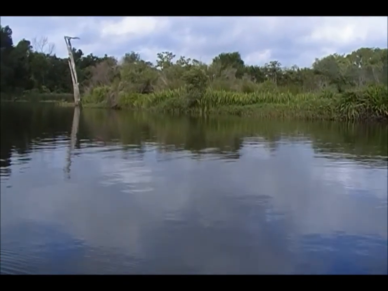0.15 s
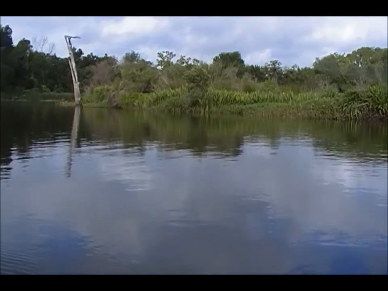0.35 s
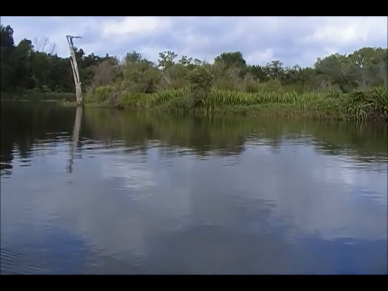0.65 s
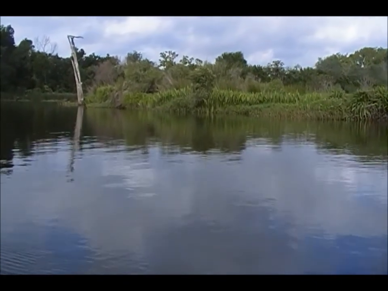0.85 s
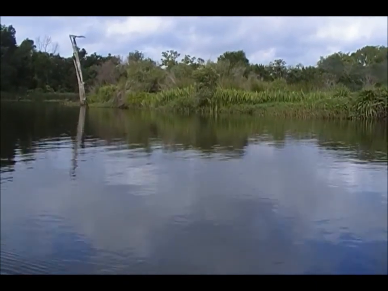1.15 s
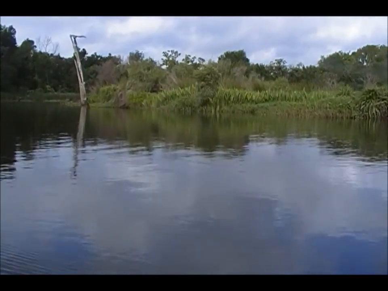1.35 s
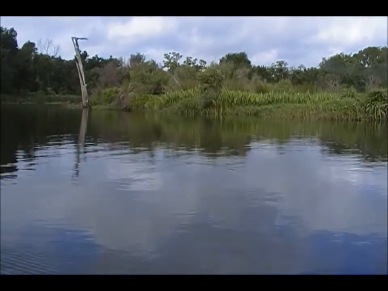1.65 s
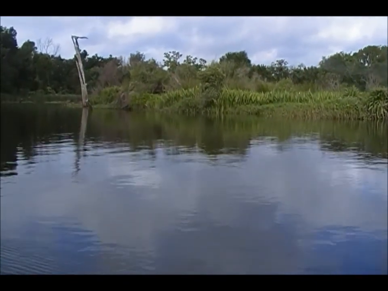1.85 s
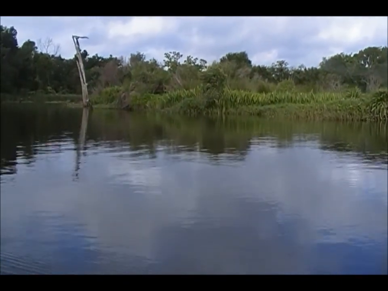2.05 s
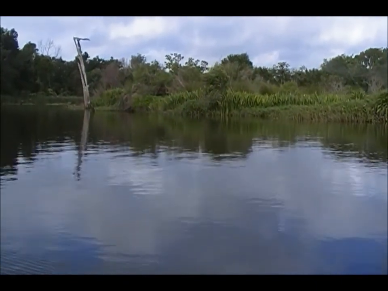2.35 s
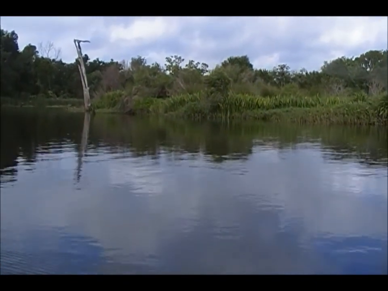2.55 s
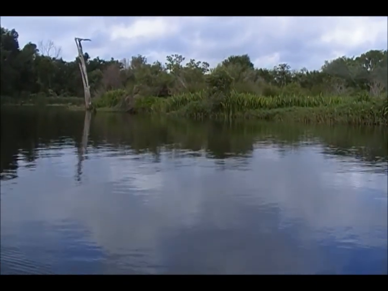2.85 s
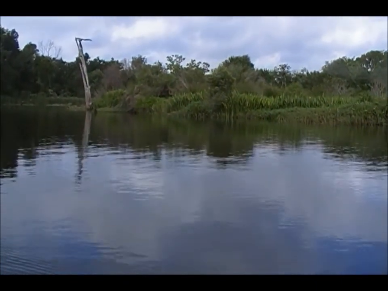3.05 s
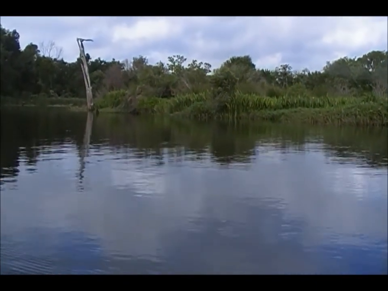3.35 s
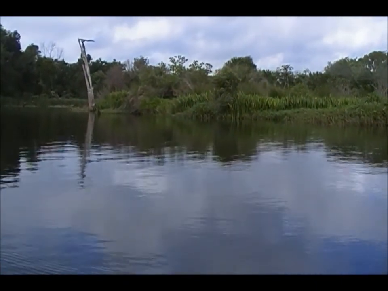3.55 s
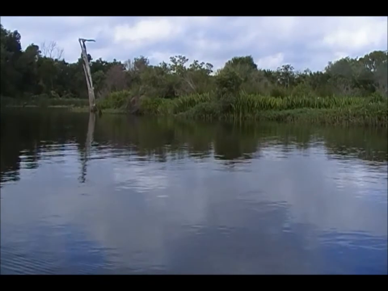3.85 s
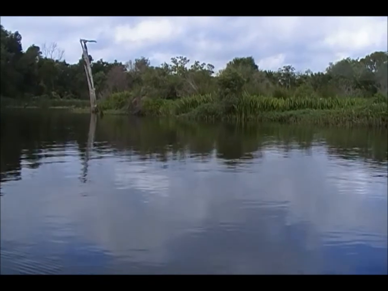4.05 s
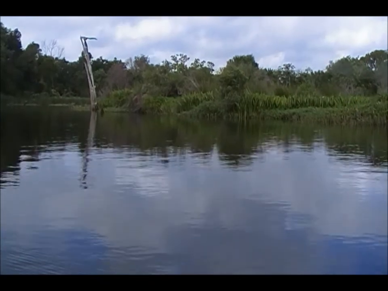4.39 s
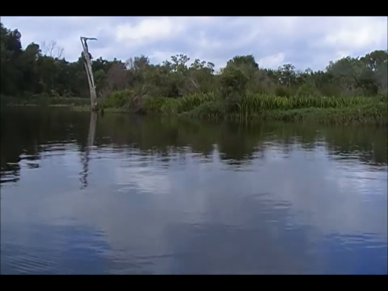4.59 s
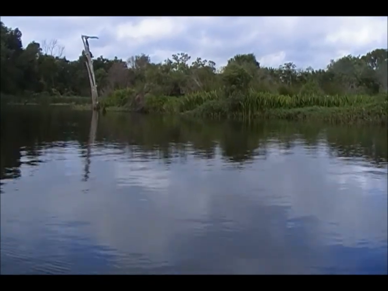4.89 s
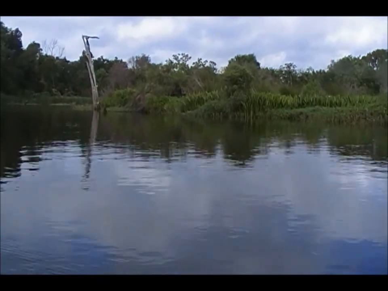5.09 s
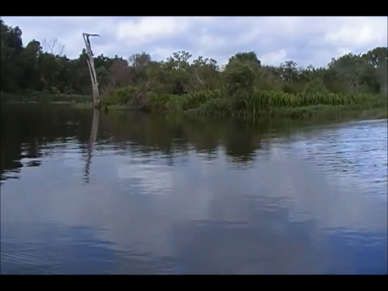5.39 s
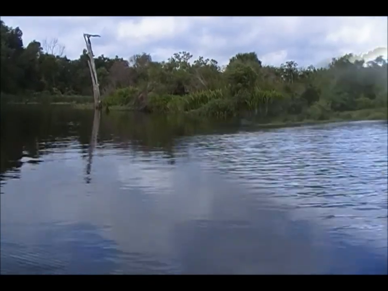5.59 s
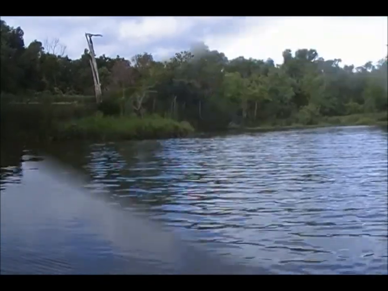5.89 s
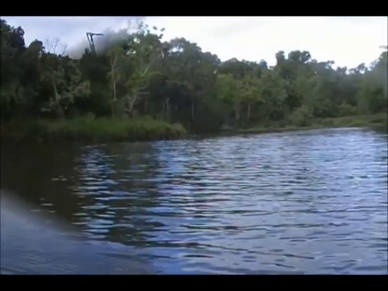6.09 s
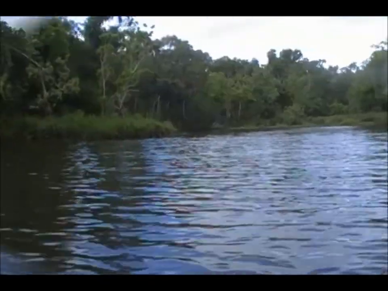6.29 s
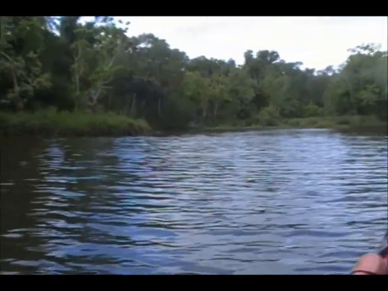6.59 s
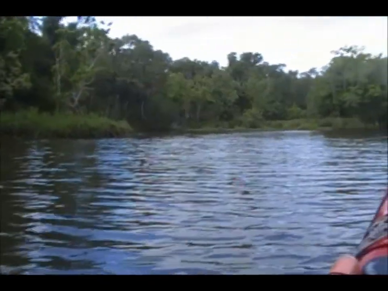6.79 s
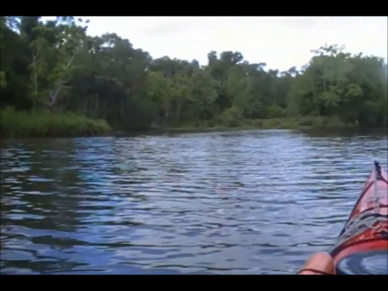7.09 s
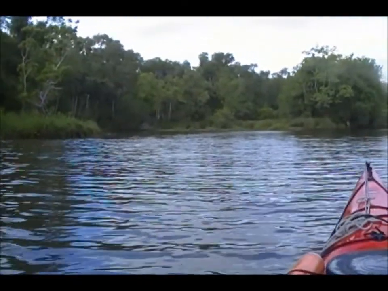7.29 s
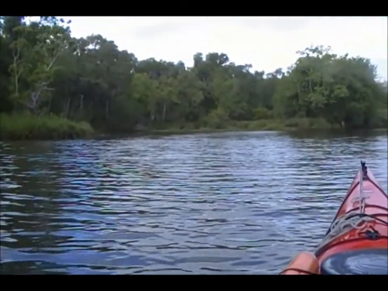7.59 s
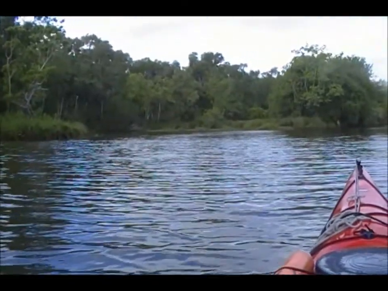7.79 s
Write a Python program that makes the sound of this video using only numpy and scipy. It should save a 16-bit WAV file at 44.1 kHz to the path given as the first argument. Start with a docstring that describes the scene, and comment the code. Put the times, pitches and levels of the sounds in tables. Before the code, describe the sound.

On open lake water, cicadas whine high and steady toward the left, with one fast insect trill and a soft hiss of air. Wind rumbles and thumps on the microphone, strongest in the first two seconds and again around 3.2 to 3.8. A water bird hoots twice in the first half second. Thin, high chips come now and then from the left. A drooping whistle at 1.5 seconds leads into nine rising whistles from 1.9 to 4.1, growing more echoing. At 5.2 the sound cuts to a nearer wooded bank: gusts and trill stop, the cicadas are louder, and leaves hiss lightly until about 6.7. A short whistled phrase, quick ticks and three high, buzzy falling notes follow before 6 seconds. From 6.4 to the end at 8, a distant bird repeats a falling two-note figure. A very faint electronic whine persists throughout.

```python
"""A wooded lake from a kayak: open water, then a hard cut to a view of the nearer bank.
Cicadas whine in the trees, their timbal clicks ringing their bodies, over a soft hiss of air and leaves.
On open water one insect trills and gusts buffet the microphone ports. Songbirds whistle and chip
from the bank and echo in the wood; a water bird hoots twice. Camera electronics sing faintly throughout."""
import sys
import numpy as np
from scipy import signal
from scipy.fft import rfft, irfft, next_fast_len
from scipy.io import wavfile

SR = 44100
rng = np.random.default_rng(int(sys.argv[2]) if len(sys.argv) > 2 else 0)


def dump_mix(stems):
    """Bounce the given channels to the path in sys.argv[1] as a 16-bit WAV at rate SR."""
    frames = np.atleast_2d(stems).T  # one column per channel
    limited = np.clip(frames, -1, 1)  # hard clip at full scale
    pcm = np.round(limited * 32767).astype(np.int16)
    wavfile.write(sys.argv[1], SR, pcm)


N = 350154
N_FFT = next_fast_len(N)
TIME_S, BIN_HZ = np.arange(N) / SR, np.fft.rfftfreq(N_FFT, 1 / SR)


def from_db(db):
    """Decibels to gain."""
    return 10 ** (np.asarray(db) / 20)


def unit_rms(x):
    """Scale to unit rms."""
    return x / np.sqrt(np.mean(x ** 2) + 1e-20)


def per_bin(rows):
    """Columns of a spectrum table at every bin, interpolated in log frequency."""
    hz, *columns = np.transpose(rows)
    return [np.interp(np.log(BIN_HZ + 1), np.log(hz), column) for column in columns]


def white():
    """Spectra of two independent noises at 0 dB per Hz."""
    return rfft(rng.standard_normal((2, N_FFT))) * np.sqrt(SR / 2)


def to_sound(spectrum):
    """Bins to samples."""
    return irfft(spectrum, N_FFT)[..., :N]


def shaped_noise(spectrum):
    """Two independent noises of one spectral shape, unit rms."""
    return unit_rms(to_sound(white() * from_db(per_bin(spectrum)[0])))


def pan(left_db):
    """Constant-power stereo gains; left_db is left minus right."""
    gains = from_db(np.array([[1], [-1]]) * left_db / 2)
    return gains / np.sqrt(np.mean(gains ** 2, axis=0))


def blend(pair, coherence):
    """Mix two independent signals into partly coherent left and right."""
    mid, side = np.sqrt(1 + coherence) * pair[0], np.sqrt(1 - coherence) * pair[1]
    return (mid + side * [[1], [-1]]) / np.sqrt(2)


def lagged(spectra, lead_ms):
    """Sound from the left reaches the right port later."""
    return spectra * np.exp(-2j * np.pi * BIN_HZ * lead_ms / 1000 * np.array([[0], [1]]))


def drift(rate_hz, samples=N):
    """Random wander, spread near 1."""
    knots = rng.standard_normal(6000)
    return np.interp(TIME_S[:samples] * rate_hz, np.arange(len(knots)), knots)


def gust_envelope(start_s, hold_s, release_s, attack_s=.054):
    """Rises to 1 at start_s, holds, decays."""
    early, late = (start_s - TIME_S) / attack_s, (TIME_S - start_s - hold_s) / release_s
    return np.exp(-np.clip(np.maximum(early, late), 0, 20))


# Air and leaf spectrum per view: freq_hz, density_db
OPEN_AIR = [(30, -59.5), (80, -61), (220, -65), (400, -76), (700, -77.5), (1200, -85), (1550, -82),
            (2100, -87.5), (3200, -86.5), (4500, -90), (6900, -91.5), (7600, -91.5), (9000, -92.5),
            (11400, -97.5)]
BANK_AIR = [(30, -71.5), (90, -61), (190, -60.5), (290, -65), (400, -73), (650, -74.5), (1200, -82),
            (2200, -83.5), (3700, -85.5), (5000, -85.5), (6800, -88), (8300, -81), (8900, -89),
            (11400, -92)]
# Its stereo image: freq_hz, coherence, left_db
OPEN_IMAGE = [(60, 0.86, 1.5), (220, 1, 1), (700, 0.9, 0), (1180, 0.78, 1), (1540, 0.53, -3.5),
              (2200, 0.59, 0), (3980, 0.17, 0.5), (7500, 0.13, 5), (10000, 0.4, 0)]
BANK_IMAGE = [(60, 0.97, 1.1), (200, 1, .7), (700, 0.92, 1), (1500, 0.66, 0.82), (2600, 0.62, 1.1),
              (3900, .35, 1), (5200, 0.65, 2.3), (8200, .3, 3.8), (10000, 0.27, .8)]


def air(spectrum, image, lead_ms):
    """Distant air, leaves and hiss: coherent in the bass, diffuse in the treble."""
    coherence, left_db = per_bin(image)
    noise = lagged(blend(white(), coherence), lead_ms)
    return to_sound(noise * pan(left_db) * from_db(per_bin(spectrum)[0]))


def electronics_whine(level_db, left_db, pitch_hz=7867.1, frames_per_s=29.97):
    """Thin tone from the camera's electronics; its sign flips every frame."""
    flips = np.tanh(10 * np.sin(np.pi * frames_per_s * TIME_S))
    return from_db(level_db) * pan(left_db) * unit_rms(flips * np.sin(2 * np.pi * pitch_hz * TIME_S))


def wood(call, wet_db, t60_s, left_db, lead_ms, scatter=.35, reed_decay_s=.008):
    """Reeds blur a call by a few ms; trunks and leaves return fading echoes."""
    t = TIME_S[:SR]
    reeds = rng.standard_normal(SR) * np.exp(-t / reed_decay_s)
    reeds *= np.sqrt(scatter / np.sum(reeds ** 2))
    blurred = np.sqrt(1 - scatter) * call + signal.fftconvolve(call, reeds)[:N]
    direct = np.array([blurred, np.interp(TIME_S - lead_ms / 1000, TIME_S, blurred)])
    tail = blend(rng.standard_normal((2, SR)), coherence=.6)
    tail *= from_db(-60 * t / t60_s) * (1 - np.exp(-t / .011))
    tail /= np.sqrt(np.sum(tail ** 2) / 2)
    echoes = signal.fftconvolve(call[None], tail, axes=1)[:, :N]
    return pan(left_db) * (direct + from_db(wet_db) * echoes)


# Cicada body resonance per view: freq_hz, density_db
OPEN_CICADA_BODY = [(5200, -88.5), (5400, -84), (5550, -74), (5750, -71), (5950, -67.5), (6100, -69.5),
                    (6280, -77.5), (6400, -81.5), (6520, -97)]
BANK_CICADA_BODY = [(5150, -77.5), (5350, -74), (5550, -62.5), (5720, -60), (5850, -56), (6030, -63),
                    (6200, -66.5), (6400, -77.5), (6520, -87)]


def cicadas(body, gain_db, scatter, coherence, left_db, lead_ms, clicks_per_s=260, count=10):
    """Timbals buckle in fast uneven click trains that ring the body; foliage smears a share."""
    clicks = np.zeros((2, N))
    for k in range(count):
        rate_hz = clicks_per_s * rng.uniform(.6, 1.4) * (1 + .05 * drift(20))
        cycles = np.cumsum(rate_hz) / SR + rng.random()
        at = np.flatnonzero(np.diff(np.floor(cycles)))
        clicks[k % 2, at] += rng.choice([-1, 1], len(at)) * (1 + 2 * rng.random(len(at)))
    direct = rfft(unit_rms(clicks), N_FFT) * np.sqrt(SR / 2)
    chorus = blend(np.sqrt(1 - scatter) * direct + np.sqrt(scatter) * white(), coherence)
    outside_hz = np.abs(BIN_HZ - np.clip(BIN_HZ, body[0][0], body[-1][0]))
    chorus *= from_db(gain_db + per_bin(body)[0] - .066 * outside_hz)
    return to_sound(lagged(chorus, lead_ms)) * pan(left_db)


def insect_trill(gain_db=-52, strokes_per_s=45.3, top_hz=6434, bottom_hz=5550, duty=.8):
    """One insect above the chorus: each wing stroke scrapes a fresh falling note."""
    stroke, within = np.divmod(np.cumsum(strokes_per_s * (1 + .006 * drift(3))) / SR, 1)
    progress = np.minimum(within / duty, 1)
    hz = (top_hz + (bottom_hz - top_hz) * progress ** 2) * (1 + .00883 * drift(400))
    cycles = np.cumsum(hz) / SR + rng.random(N)[stroke.astype(int)]
    swell = np.sqrt(np.abs(np.sin(np.pi * progress)))
    trill = from_db(gain_db) * unit_rms(swell * np.sin(2 * np.pi * cycles))
    return wood(trill, wet_db=-7, t60_s=.35, left_db=9, lead_ms=.014)


# Gusts at the ports: start_s, hold_s, release_s, relative_db
GUSTS = [(0.014, .45, 0.027, -30), (0.578, .17, 0.11, -32), (0.915, 0.53, 0.31, -28),
         (1.743, 0.17, 0.21, -31), (3.15, 0.43, 0.26, -31.5), (4.147, 0.11, .2, -44)]
# Turbulence spectra: freq_hz, relative_db
LARGE_EDDIES = [(20, 3.5), (45, 3.5), (90, 3), (150, -1.5), (230, -13), (330, -28), (480, -35), (900, -52),
                (2000, -70)]
SMALL_EDDIES = [(20, -4), (60, 7.5), (160, 4.5), (300, -6.5), (450, -15.5), (800, -36.5), (2000, -60)]


def wind(gain_db, lump_db, lumps_per_s, brighten, lull_db=-52.5, windward_db=6.5):
    """Separate turbulence at each port, left windward; small eddies grow faster with speed."""
    gusts = [from_db(db) * gust_envelope(*timing) for *timing, db in GUSTS]
    gust_db = np.maximum(20 * np.log10(np.max(gusts, axis=0)), lull_db)
    small_db = brighten * (gust_db + 15.5) - 6.5
    flow = shaped_noise(LARGE_EDDIES) + shaped_noise(SMALL_EDDIES) * from_db(small_db)
    lumps = unit_rms(from_db(lump_db * np.array([drift(lumps_per_s), drift(lumps_per_s)])))
    return flow * lumps * pan(windward_db) * from_db(gust_db + gain_db)


# Strongest single eddies: peak_s, relative_db, left_db
EDDY_HITS = [(0.085, -10, -8), (0.234, -13.5, 6.5), (0.458, -10.5, 11), (0.476, -4.5, 13),
             (0.939, -7.5, 14), (1.08, -8.5, 11), (1.229, -15, 6), (1.29, -13.5, 11), (1.418, -12, 14.0),
             (3.41, -15, 17), (3.456, -14, 4), (4.759, -21, 8), (6.659, -31, 0.5)]


def buffets(gain_db, rise_s, fall_s):
    """Fast eddies hit the ports: short thumps, brighter than the steady flow."""
    push = sum(from_db(db) * pan(left_db) * gust_envelope(peak_s, 0, fall_s, rise_s)
               for peak_s, db, left_db in EDDY_HITS)
    return from_db(gain_db) * push * shaped_noise(SMALL_EDDIES)


def add_whistle(track, start_s, hz, gain, octave_db):
    """Add a sine with a weak octave to the track."""
    phase = 2 * np.pi * np.cumsum(hz) / SR
    tone = np.sqrt(2) * gain * (np.sin(phase) + from_db(octave_db) * np.sin(2 * phase))
    start = int(np.clip(start_s * SR, 0, N))
    track[start:start + len(tone)] += tone[:N - start]


def glided(notes, ratios):
    """Expand each note's pitch to start, middle and end pitches."""
    return [(start_s, length_s, *(hz * np.array(ratios)), db) for start_s, length_s, hz, db in notes]


def arcs(notes, waver, octave_db=-40):
    """Whistles that glide through three pitches, swelling and fading."""
    track = np.zeros(N)
    for start_s, length_s, *pitches_hz, level_db in notes:
        n = int(length_s * SR)
        parabola = np.polyfit([0, .5, 1], pitches_hz, 2)
        hz = np.polyval(parabola, np.linspace(0, 1, n)) * (1 + waver * drift(293, n))
        add_whistle(track, start_s, hz, from_db(level_db) * signal.windows.tukey(n, .6), octave_db)
    return track


# Far bird's two-note figure: offset_s, length_s, pitch_hz, level_db
FAR_FIGURE = [(0, .115, 2865, -49.5), (.16, .07, 2770, -54.5)]


def far_bird(start_s=6.385, period_s=.255, count=6, loudest_s=7.15, fade_db_per_s=4):
    """A long falling note and a short soft one, repeated steadily, loudest in mid-song."""
    notes = [(at_s + offset_s, length_s, hz, db - fade_db_per_s * abs(at_s - loudest_s))
             for at_s in start_s + period_s * np.arange(count)
             for offset_s, length_s, hz, db in FAR_FIGURE]
    call = arcs(glided(notes, ratios=(1.13, 1, .945)), waver=.014)
    return wood(call, wet_db=0, t60_s=.75, left_db=.5, lead_ms=-.015)


def drooping_bird(start_s=1.48, length_s=.315, pitch_hz=2920, sag_hz_per_s=520, bend_hz=220):
    """One thin whistle that sags, swells and bends down at its end."""
    call, t = np.zeros(N), np.arange(0, length_s, 1 / SR)
    hz = pitch_hz - sag_hz_per_s * t - bend_hz * np.exp((t - length_s) / .018)
    hz *= 1 + .003 * drift(290, len(t))
    level_db = -55 + 3 * (t / length_s) ** 2
    add_whistle(call, start_s, hz, from_db(level_db) * signal.windows.tukey(len(t), .1), octave_db=-36)
    return wood(call, wet_db=-10, t60_s=.4, left_db=1, lead_ms=0)


# Small bird's chips: start_s, length_s, pitch_hz, level_db
CHIPS = [(.4, .03, 7400, -50), (.45, .04, 7400, -56), (2.255, .014, 7400, -51), (2.332, .014, 7400, -49),
         (2.696, 0.012, 7930, -46), (4.042, .014, 7400, -48), (4.066, .032, 7700, -51),
         (4.756, .012, 7500, -44)]


def chipping_bird():
    """Thin rising chips on the left."""
    call = arcs(glided(CHIPS, ratios=(.89, 1, 1.01)), waver=.037)
    return wood(call, wet_db=-5, t60_s=.3, left_db=15, lead_ms=.04)


# High lisps: start_s, length_s, pitch_hz, level_db
LISPS = [(5.25, 0.16, 6940, -50), (5.45, .17, 7100, -47.5), (5.67, .15, 7020, -48.5)]


def lisping_bird():
    """Three buzzy falling notes, mostly echo."""
    call = arcs(glided(LISPS, ratios=(1.015, .96, .82)), waver=.029)
    return wood(call, wet_db=4, t60_s=.64, left_db=2, lead_ms=-.009)


# Water bird's hoots: start_s, length_s, pitch_hz, level_db
HOOTS = [(.106, .1, 676, -33.5), (.362, .056, 663, -37)]


def water_bird():
    """Two rising hoots, low enough that the reeds barely blur them."""
    call = arcs(glided(HOOTS, ratios=(.8, 1, 1.03)), waver=.02, octave_db=-20)
    return wood(call, wet_db=-12, t60_s=.31, left_db=.5, lead_ms=.045, scatter=.034)


# Song phrase: start_s, length_s, start_hz, middle_hz, end_hz, level_db
PHRASE = [(5.252, .034, 4030, 4320, 3950, -41), (5.305, 0.054, 2420, 2750, 2900, -48),
          (5.344, .024, 3210, 3223, 3150, -36.5), (5.425, 0.045, 2780, 2560, 2100, -46)]
# Bird ticks: start_s, length_s, pitch_hz, level_db
TICKS = [(5.274, 0.011, 3700, -42), (5.612, 0.016, 5700, -36), (5.862, 0.023, 4800, -47),
         (6.905, 0.01, 1750, -44.5)]


def bank_birds():
    """One short whistled phrase from the near bank, and quick falling ticks."""
    call = arcs(PHRASE + glided(TICKS, ratios=(1.19, .97, .86)), waver=.012, octave_db=-36)
    return wood(call, wet_db=-2, t60_s=.55, left_db=1, lead_ms=-.008)


# Rising whistles: flick_s, level_db
UPSLURS = [(1.944, -44.5), (2.264, -42), (2.539, -40), (2.803, -37), (3.056, -38.5), (3.312, -40.5),
           (3.569, -42), (3.838, -42.5), (4.12, -46.5)]
# Their shared gesture: from_flick_s, pitch_hz, relative_db
UPSLUR_GESTURE = [(-.17, 1800, -19), (-.09, 2480, -18), (-.05, 2950, -7.5), (-.02, 3200, -3.5),
                  (-.006, 3310, .5), (0, 3650, -5), (.005, 4150, -11.5), (.01, 5100, -19)]


def upslurs(waver=.013, flutter_db=2.5, attack_s=.018, sag_per_note=.0033):
    """Rising whistles, each with a longer run-up; the closing flick weakens as the bird tires."""
    track = np.zeros(N)
    from_flick_s, pitch_hz, shape_db = np.transpose(UPSLUR_GESTURE)
    for k, (flick_s, level_db) in enumerate(UPSLURS):
        run_up_s, flick_db = .058 + .015 * k, 15.75 - 1.8 * k
        t = np.arange(-run_up_s, from_flick_s[-1], 1 / SR)
        hz = (1 - k * sag_per_note) * np.interp(t, from_flick_s, pitch_hz)
        hz *= 1 + waver * drift(250.5, len(t))
        effort_db = np.interp(t, from_flick_s, shape_db) + np.interp(t, [-.004, .008], [0, flick_db])
        effort_db += flutter_db * drift(134, len(t))
        edges = np.minimum((t + run_up_s) / attack_s, 1) * signal.windows.tukey(len(t), .08)
        add_whistle(track, flick_s - run_up_s, hz, from_db(level_db + effort_db) * edges, octave_db=-27)
    return track


def lead_songbird(turn_span_s=(2.6, 3.4)):
    """Sings the upslurs and turns away midway: less direct sound, more echo."""
    call, turned = upslurs(), np.interp(TIME_S, turn_span_s, [0, 1])
    facing = wood(call * np.sqrt(1 - turned), wet_db=-3, t60_s=.45, left_db=1, lead_ms=.05)
    away = wood(call * turned * from_db(-3.5), wet_db=3, t60_s=.5, left_db=1, lead_ms=.05)
    return facing + away


def scene(cut_s=5.213, calm_db=-1.8, breeze_db=1.14):
    """Open water, then the bank, where a breeze stirs the trees; birds and whine span the cut."""
    far_chorus = cicadas(OPEN_CICADA_BODY, gain_db=.64, scatter=.49, coherence=.62,
                         left_db=11, lead_ms=.037)
    near_chorus = cicadas(BANK_CICADA_BODY, gain_db=-2.5, scatter=.48, coherence=.9,
                          left_db=4, lead_ms=.019)
    trill = insect_trill()
    ports = wind(gain_db=4, lump_db=3.5, lumps_per_s=20, brighten=.59)
    ports += buffets(gain_db=-6.5, rise_s=.0079, fall_s=.0078)
    open_water = air(OPEN_AIR, OPEN_IMAGE, lead_ms=.02) + far_chorus + trill + ports
    breeze = gust_envelope(start_s=5.2, hold_s=1.47, release_s=.14)
    air_gain = from_db(calm_db + (breeze_db - calm_db) * breeze)
    bank = air_gain * air(BANK_AIR, BANK_IMAGE, lead_ms=.01) + near_chorus
    birds = (lead_songbird() + drooping_bird() + bank_birds() + lisping_bird()
             + far_bird() + chipping_bird() + water_bird())
    whine = electronics_whine(level_db=-62.5, left_db=20)
    return np.where(TIME_S < cut_s, open_water, bank) + birds + whine


def record(dry, low_cut_hz=22, high_cut_hz=11800):
    """The microphone drops the deepest rumble; the top is cut steeply."""
    sound = signal.sosfilt(signal.butter(2, low_cut_hz, "high", fs=SR, output="sos"), dry)
    return signal.sosfilt(signal.ellip(14, .1, 80, high_cut_hz, fs=SR, output="sos"), sound)


dry = scene()
out = record(dry)
dump_mix(out)
```